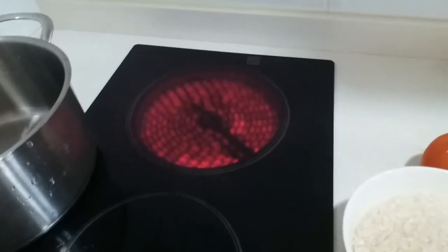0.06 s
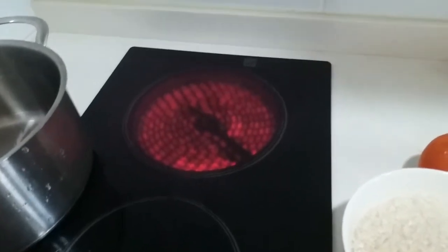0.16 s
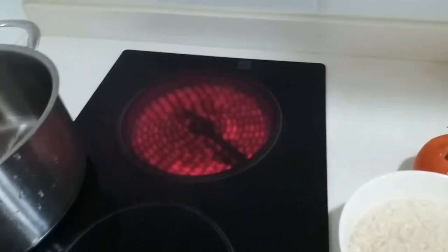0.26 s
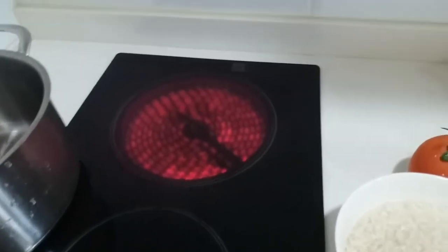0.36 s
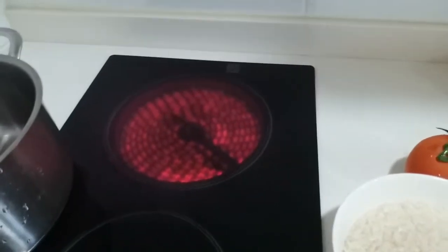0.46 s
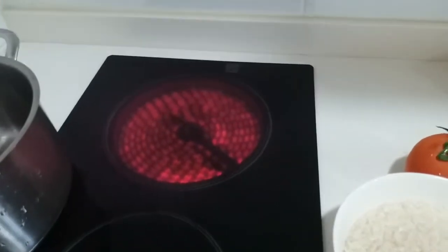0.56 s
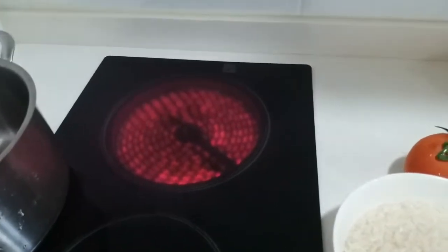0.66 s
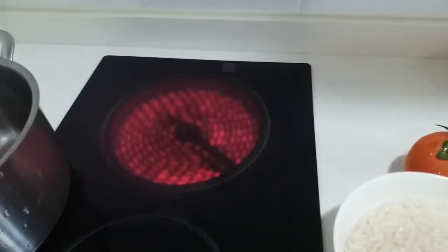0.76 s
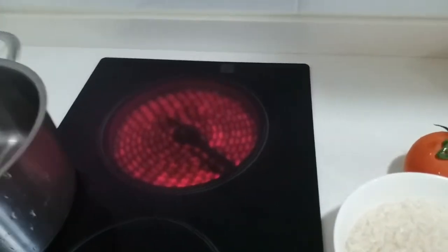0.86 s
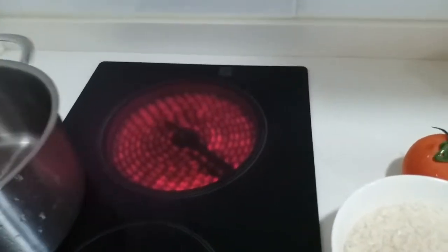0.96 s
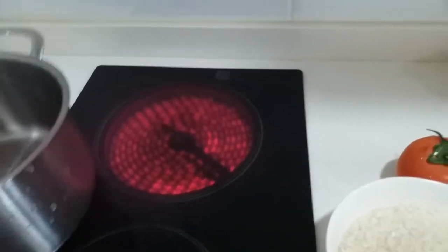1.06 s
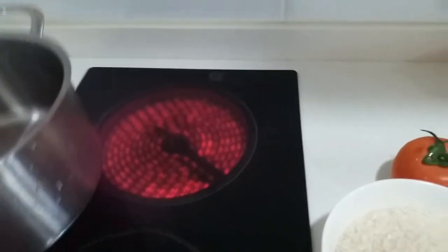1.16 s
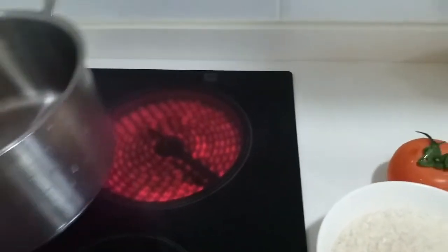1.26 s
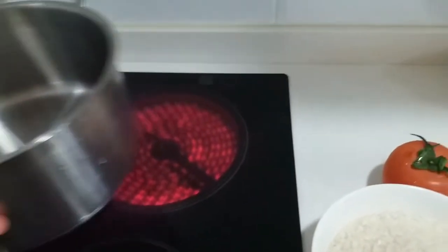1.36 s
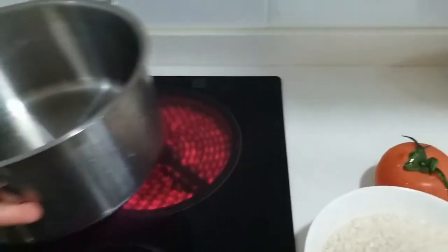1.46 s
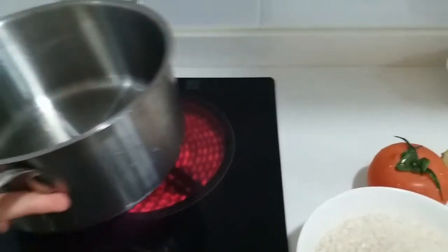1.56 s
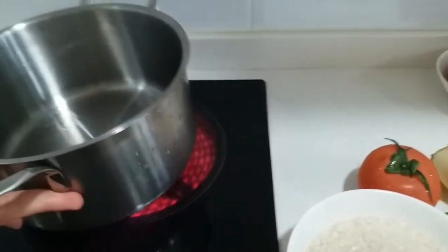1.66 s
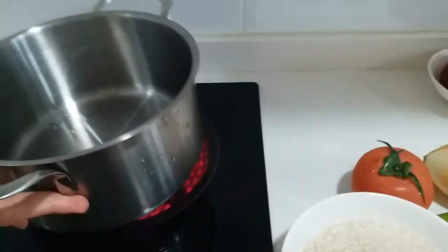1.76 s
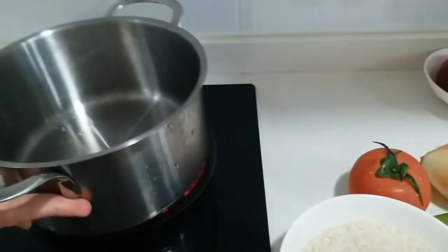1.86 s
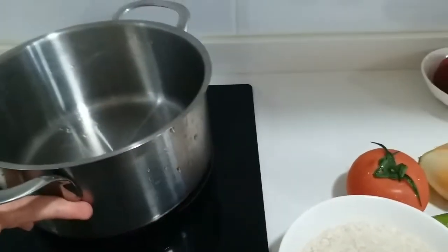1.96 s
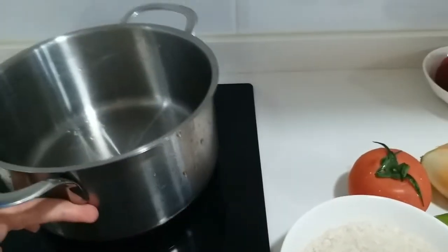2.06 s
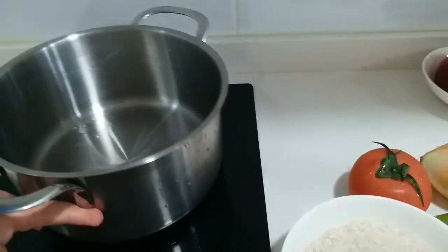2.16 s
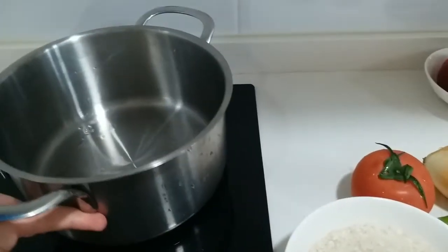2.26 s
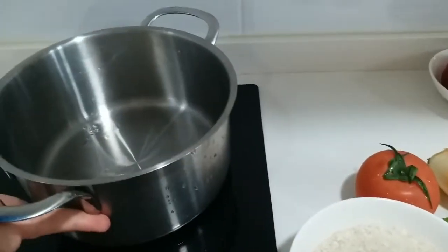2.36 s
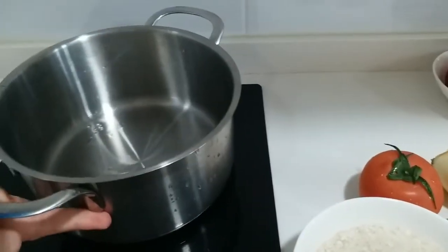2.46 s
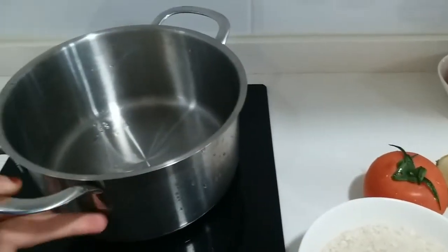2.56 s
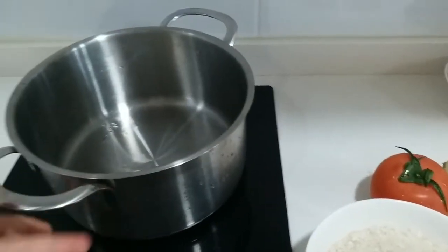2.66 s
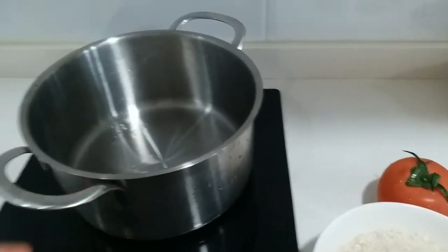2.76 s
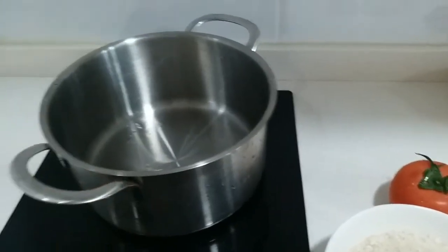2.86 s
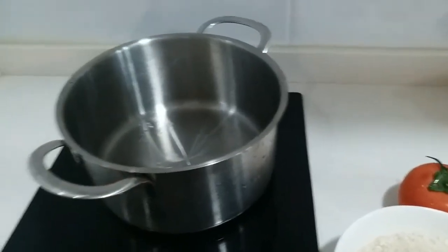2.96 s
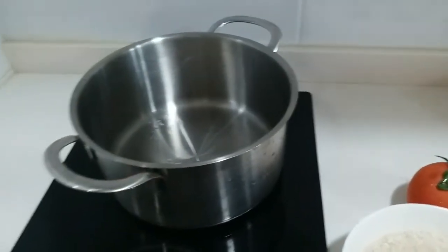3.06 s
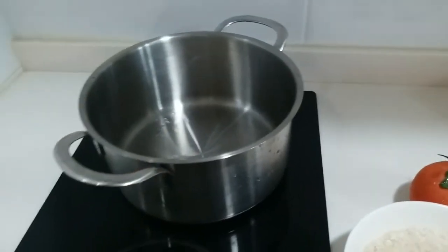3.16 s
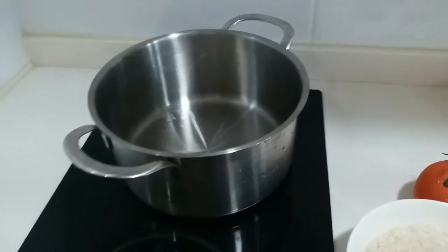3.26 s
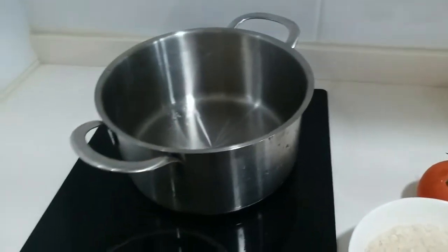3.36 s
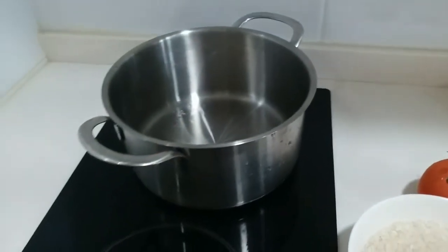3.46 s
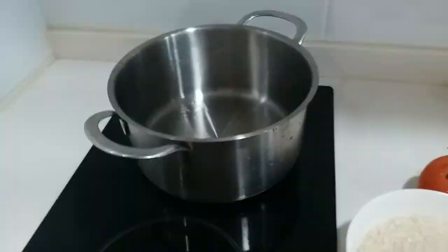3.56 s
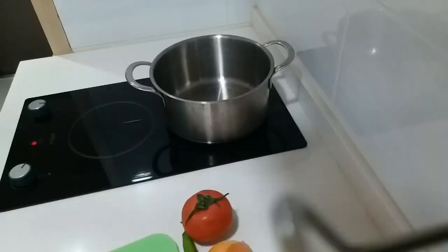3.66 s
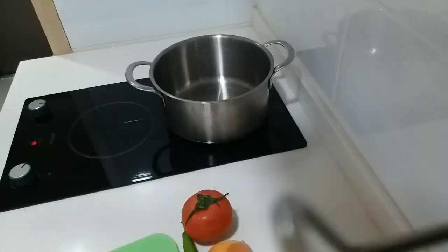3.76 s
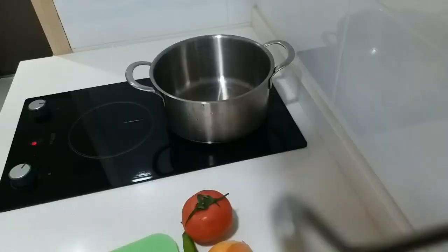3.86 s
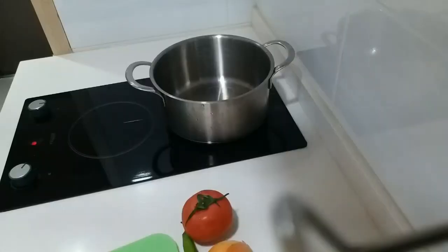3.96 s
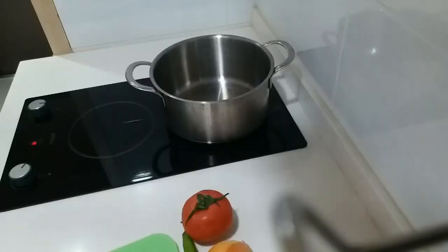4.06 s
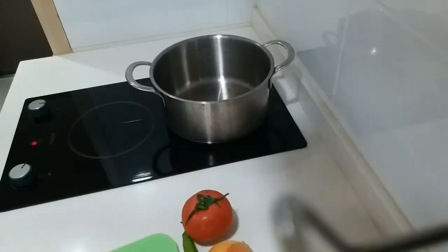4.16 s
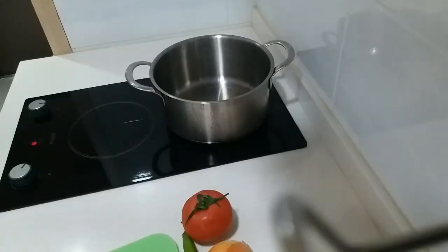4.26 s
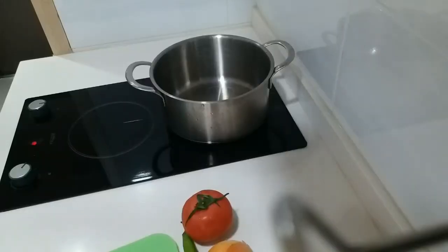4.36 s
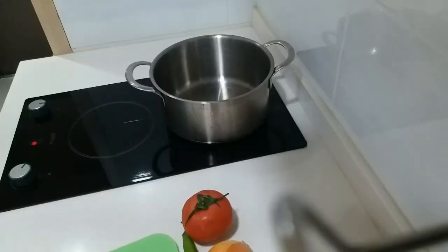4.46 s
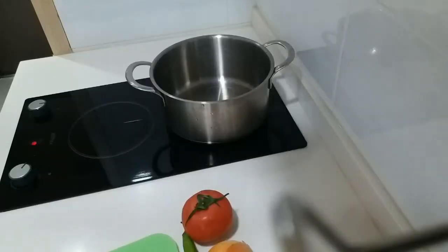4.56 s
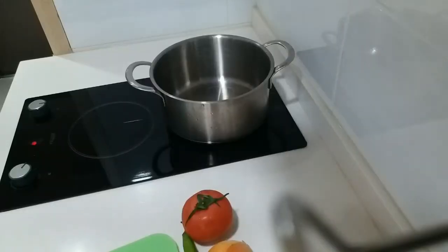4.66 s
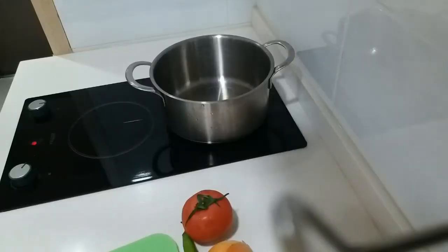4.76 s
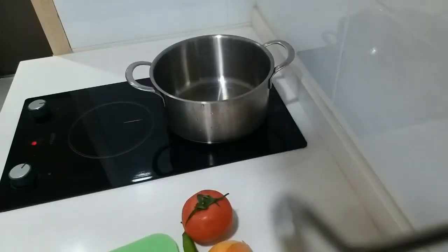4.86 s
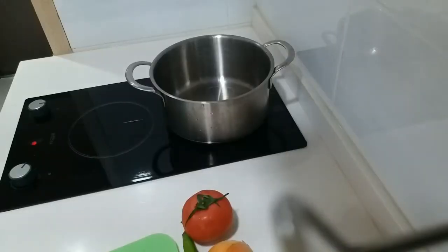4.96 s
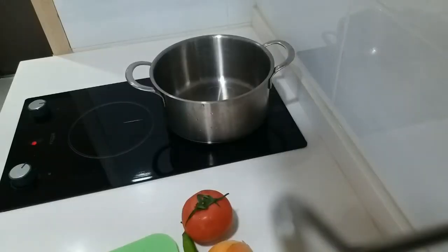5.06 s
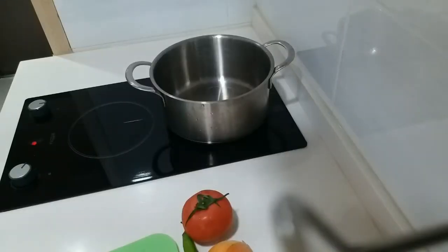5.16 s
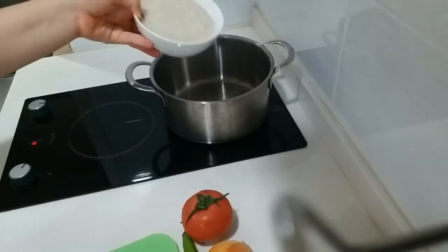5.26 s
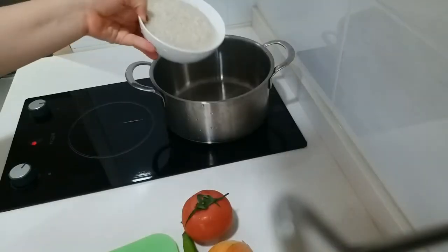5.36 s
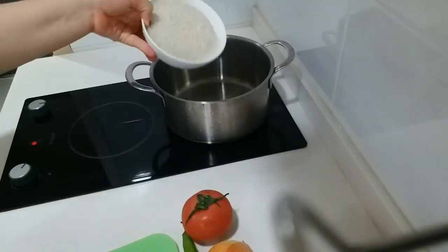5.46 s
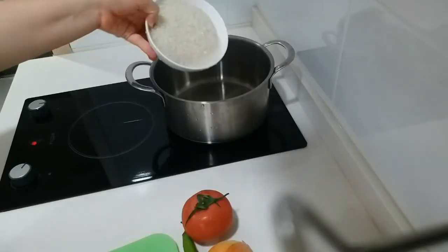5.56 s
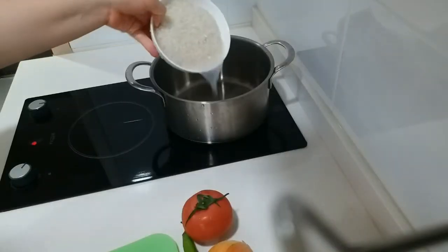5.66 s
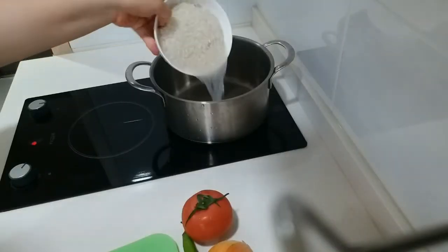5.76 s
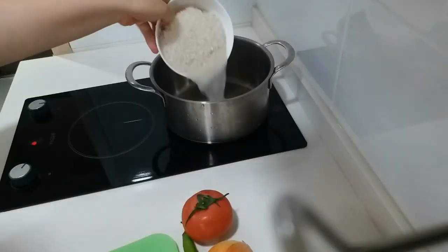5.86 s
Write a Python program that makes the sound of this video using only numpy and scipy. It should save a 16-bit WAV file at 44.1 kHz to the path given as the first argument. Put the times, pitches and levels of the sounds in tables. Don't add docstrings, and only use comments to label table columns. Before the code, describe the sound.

Brief metal scrapes, a ringing pot clank on glass, close stiff crackling snaps, and finally dry grains starting to pour into steel, over a faint appliance hum.

```python
import sys
import numpy as np
from scipy import signal
from scipy.io import wavfile
from scipy.ndimage import uniform_filter1d

SR = 44100
rng = np.random.default_rng(int(sys.argv[2]) if len(sys.argv) > 2 else 0)


def int16_out(signal):
    q = np.round(np.clip(np.atleast_2d(signal).T, -1, 1) * 32767)
    wavfile.write(sys.argv[1], SR, q.astype(np.int16))


def to_linear_factor(level_db):
    exponent = np.asarray(level_db, float) / 20
    return 10 ** exponent


N = 260190
PORT_LAG = 7

# time in seconds, level in dB.
DRONE_LOAD = [(0.0, -53.5), (0.49, -61.5), (1.0, -56), (1.15, -59.5), (1.36, -70.5), (1.69, -54),
              (1.77, -61.5), (2.3, -56), (2.65, -62), (3.42, -61), (3.53, -57.5), (4.34, -57), (4.4, -56),
              (5.01, -67), (5.36, -59), (5.52, -60), (5.78, -57.5), (5.9, -46.5)]
# frequency in Hz, density in dB per Hz.
FIZZ_COLOUR = [(4120, -43), (7000, -18.5), (8090, -13), (9170, -9.5), (9890, -4), (12000, 2.5),
               (15200, -2.5), (16000, -12.5)]
# start in seconds, level in dB.
LANDINGS = [
    (2.1259, -1),
    (2.1289, -6),
    (2.1332, -7),
    (2.1415, -14),
]


def evened(x):
    return x / np.sqrt(np.mean(x ** 2) + 1e-20)


def read(points, hz):
    f, value = np.transpose(points)
    return np.interp(np.log(hz + 1), np.log(f + 1), value)


def add(mix, s, sound):
    part = mix[..., round(s * SR):][..., :sound.shape[-1]]
    part += sound[..., :part.shape[-1]]


def curve(rows, column):
    rows = np.asarray(rows)
    return to_linear_factor(np.interp(np.arange(N) / SR, rows[:, 0], rows[:, column], -140, -140))


def band(x, lo_hz, hi_hz):
    return signal.sosfilt(signal.butter(3, [lo_hz, hi_hz], "bandpass", fs=SR, output="sos"), x)


def colour(x, points):
    level_db = np.maximum(read(points, abs(np.fft.fftfreq(4096, 1 / SR))), -100)
    spectrum = np.exp(np.conj(signal.hilbert(np.log(to_linear_factor(level_db)))))
    taps = np.fft.ifft(spectrum).real[:2048]
    taps = np.broadcast_to(taps, x.shape[:-1] + taps.shape) / np.linalg.norm(taps)
    return signal.oaconvolve(x, taps, axes=-1)[..., :N]


def resonate(x, hz, width):
    pole = np.exp((2j * np.pi * hz - np.pi * width) / SR)
    return 2 * signal.lfilter([1 - abs(pole)], [1, -pole], x).real


def ring(x, peaks):
    return evened(sum(to_linear_factor(db) * resonate(x, hz, width) for hz, width, db in peaks))


def grains(per_s, spread_db):
    size_db = spread_db * np.minimum(rng.exponential(1, (2, N)), 4)
    size = to_linear_factor(size_db) * rng.choice([-1., 1.], (2, N))
    return evened(size * (rng.random((2, N)) < per_s / SR))


def sides(pan_db):
    return to_linear_factor(np.array([[pan_db / 2], [-pan_db / 2]]))


def room_tone():
    # frequency in Hz, density in dB per Hz.
    near_colour = [(15, -82), (25, -52), (84, -9.5), (102, -16), (123, -2), (161, -24.5), (185, -20.5),
                   (335, -13.5), (384, -32), (451, -18), (714, -31), (1050, -36), (1700, -32),
                   (2840, -41.5), (3820, -50.5), (16000, -48)]
    far_colour = [(15, -60), (25, -39), (42, -11.5), (87, -12.5), (120, -2.5), (145, -12.5), (263, -5.5),
                  (317, -25), (384, -12.5), (463, -23.5), (659, -31.5), (2000, -44.5), (2760, -34.5),
                  (3620, -50), (16000, -49)]
    # frequency in Hz, left-right likeness from 0 to 1.
    likeness = [(60, 1), (150, 0.9), (380, 0.8), (700, 0.3), (1290, 0), (5980, 0.12), (15000, 0.12)]
    near_db, far_db, move_s = -62.5, -57.5, 3.6
    murmur_share, rumble_share = .3, .35

    frames, hz = N // 512 + 5, np.fft.rfftfreq(2048, 1 / SR)
    a, b, c, d, patches = rng.standard_normal((frames, 1025, 5)).T
    patches = evened(uniform_filter1d(uniform_filter1d(patches, 20, 0), 8, 1))
    same = np.clip(read(likeness, hz), -1, 1)[:, None]
    left = a + 1j * b
    right = same * left + np.sqrt(1 - same ** 2) * (c + 1j * d)
    right *= np.exp(2j * np.pi * hz * (hz < 700) * PORT_LAG / SR)[:, None]
    z = np.array([left, right])
    z *= to_linear_factor(np.where(hz < 1500, 1.5, .5)[:, None] * patches)
    load_db = np.interp(np.arange(frames) * 512 / SR, *np.transpose(DRONE_LOAD))
    for share, inside in ((murmur_share, (hz > 170) & (hz < 900)), (rumble_share, hz < 100)):
        z[:, inside] *= to_linear_factor(share * (load_db - load_db.mean()))

    def heard(points, db):
        shaped = z * to_linear_factor(read(points, hz))[:, None]
        x = signal.istft(shaped, nperseg=2048, noverlap=1536)[1][:, :N]
        return to_linear_factor(db) * x / band(x, 200, 16000).std()

    far = np.clip((np.arange(N) / SR - move_s) / 0.035, 0, 1)
    return (1 - far) * heard(near_colour, near_db) + far * heard(far_colour, far_db)


def drone():
    # frequency in Hz, width in Hz, level in dB.
    room_modes = [
        (119.65, 15, 0.5),
        (155.16, 14, -6),
        (347, 45, -12.5),
    ]
    waver_db, waver_hz = 4, 4.4
    noise = rng.standard_normal(N)
    main, *others = (to_linear_factor(db) * evened(resonate(resonate(noise, hz, w), hz, w)) for hz, w, db in room_modes)
    main = main / np.sqrt(uniform_filter1d(main ** 2, 1500) + 0.0057)
    waver = evened(resonate(rng.standard_normal(N), 0, waver_hz))
    waver = to_linear_factor(waver_db * evened(uniform_filter1d(waver, 900)))
    hum = curve(DRONE_LOAD, 1) * to_linear_factor(4.0) * waver * main + to_linear_factor(-56.5) * sum(others)
    whine = evened(band(rng.standard_normal((2, N)), 2640, 2900))
    return np.array([np.roll(hum, PORT_LAG), hum]) + to_linear_factor(-81) * waver ** .3 * whine


def kitchen(x):
    # frequency in Hz, t60 in seconds.
    decay = [(120, .32), (400, .3), (1500, .37), (4000, .3), (12000, .28)]
    taps = np.zeros((2, SR // 2))
    at = np.arange(120, SR // 2 - 20, 20)
    at = at + rng.integers(0, 20, (2, len(at)))
    np.put_along_axis(taps, at, rng.choice([-1., 1.], at.shape), 1)
    hz, t, z = signal.stft(taps, SR, nperseg=256)
    tail = signal.istft(z * to_linear_factor(-60 * t / read(decay, hz)[:, None]), SR, nperseg=256)[1]
    return signal.fftconvolve(x, tail / np.linalg.norm(tail[0]), axes=1)[:, :N]


def bumps():
    # start in seconds, level in dB, top frequency in Hz, length in ms.
    knocks = [
        (3.104, -60, 1800, 3.0),
        (0.948, -44, 820, 2.8),
        (2.367, -38, 151.4, 6.8),
        (3.573, -54, 2650, 7.1),
        (3.647, -57.5, 400, 8.9),
        (5.175, -67, 2000, 4),
    ]
    out, t = np.zeros((2, N)), np.arange(4000) / SR
    for s, db, top_hz, ms in knocks:
        push = rng.standard_normal((2, len(t))) * np.exp(-1000 * t / ms)
        push = signal.lfilter([1], [1, -.97], push)
        add(out, s, to_linear_factor(db) * band(push, 38, top_hz))
    return out


def faint_rattle():
    # start in seconds, level in dB.
    rattle_ticks = [(1.145, -56), (1.178, -57), (1.282, -56), (1.313, -54), (1.346, -54), (1.379, -52),
                    (1.452, -56)]
    out, t = np.zeros((2, N)), np.arange(800) / SR
    for s, db in rattle_ticks:
        add(out, s, to_linear_factor(db) * rng.standard_normal((2, len(t))) * np.exp(-1000 * t / 2.5))
    return band(out, 1700, 3000)


def strokes():
    # peak in seconds, rise and fall in seconds, level in dB, brightness in dB.
    drags = [
        (0.001, 0.0036, 0.0033, -46, -9),
        (0.486, 0.016, 0.06, -44.5, -7.5),
        (0.724, 0.47, 0.039, -67.5, -7),
        (0.92, 0.13, 0.033, -53, -12.5),
        (0.958, 0.08, 0.027, -43, -17),
        (1.72, 0.038, 0.11, -59, -27),
    ]
    # frequency in Hz, width in Hz, level in dB.
    wall_modes = [
        [(380, 43, -4.5), (947, 27, -22), (2290, 32, -11), (3650, 120, -7), (5830, 500, -6)],
        [(400, 19, -11), (947, 36, -23), (2297, 26, -17), (3460, 28, -14.5), (4840, 33, -31), (5370, 31, -30),
         (6170, 530, -22)],
        [(5370, 170, 5), (5850, 200, -12.5)],
        [(2186, 60, -1), (2600, 86, -6), (3140, 140, -12), (3460, 60, -8), (3950, 33, 0), (5600, 72, -9)],
        [(595, 15, -22), (1200, 130, -5), (2016, 80, 0), (2260, 51, 2.5), (2730, 240, -2.5), (3430, 31, -6),
         (3960, 37, 6), (5540, 90, 0)],
        [(1037, 32, 0), (2310, 100, -1.5), (3330, 75, -29), (5340, 380, 3)],
    ]
    # frequency in Hz, density in dB per Hz.
    scrape_colour = [(120, -20), (200, 8.5), (269, -7), (391, -3), (1700, -18.5), (2230, -12), (2470, -18),
                     (5520, -17.5), (7000, -56), (9100, -41), (15400, -120)]
    # start in seconds, peak
    # in dB, pitch in Hz, t60 in seconds.
    pitched_taps = [(0.483, -47.5, 1120, 0.1), (0.481, -52, 2330, 0.11), (0.4828, -48, 400, 0.064),
                    (0.495, -43, 950, 0.1), (3.5, -63.5, 3300, 0.054), (0.537, -48, 947, 0.056),
                    (0.914, -48.5, 5500, 0.06), (0.972, -51, 3960, 0.03), (4.376, -30.5, 4240, 0.04),
                    (4.7604, -30, 2600, 0.018), (0.949, -49, 2280, 0.14), (0.962, -45.5, 3556, 0.11),
                    (1.065, -48.5, 1110, 0.19), (1.717, -51, 1103, 0.096), (1.719, -57.5, 2310, 0.11),
                    (1.757, -56, 1101, 0.14)]
    span_db = 17.5
    bright_steeper, rumble_db = 1.2, -9.5

    slips, out = grains(1500, 4.2), np.zeros((2, N))
    raw, fizz = colour(slips, scrape_colour), colour(slips, FIZZ_COLOUR)
    rumble = evened(band(slips.sum(0), 54, 174))
    for (s, rise, fall, db, bright_db), peaks in zip(drags, wall_modes):
        span = slice(max(round((s - 2 * rise) * SR), 0), round((s + 2 * fall) * SR))
        t = np.arange(N)[span] / SR - s
        under_db = -span_db * np.where(t < 0, -t / rise, t / fall)
        rub = raw[:, span] + to_linear_factor(-1.5) * ring(slips[:, span], peaks)
        bright = evened(band(rub, 4060, 8400)) + to_linear_factor(-13.5) * fizz[:, span]
        bright = to_linear_factor(bright_db + bright_steeper * under_db) * bright
        bright = bright + to_linear_factor(rumble_db + under_db) * rumble[span]
        out[:, span] += to_linear_factor(db + under_db) * evened(band(rub, 223, 2700)) + to_linear_factor(db) * bright
    t = np.arange(6000) / SR
    for s, db, hz, t60 in pitched_taps:
        knock = to_linear_factor(-9.0) * rng.standard_normal(len(t)) * np.exp(-t / 0.0032)
        tone = to_linear_factor(db - 6.5 - 60 * t / min(t60, .12)) * np.sin(2 * np.pi * hz * t)
        add(out, s, tone + to_linear_factor(db) * band(knock, 300, 4400))
    return out * sides(5.3)


def clank():
    # frequency in Hz, density in dB per Hz.
    blow_colour = [(50, -29.5), (85, -4), (267, -14), (350, -7.5), (480, -12.5), (760, -17), (869, -18),
                   (1050, -13.5), (1190, -18.5), (1980, -14), (2630, -20.5), (3680, -21), (7500, -38),
                   (9750, -50.5), (16500, -120)]
    t, blows = np.arange(SR // 2) / SR, np.zeros((2, N))
    for s, db in LANDINGS:
        add(blows[0], s + .0003, -to_linear_factor([db]))
        add(blows[1], s, -to_linear_factor([db]))
    rattle = to_linear_factor(-21.0 - 60 * t / 0.082) * grains(3000, 1.2)[:, :len(t)]
    add(blows, LANDINGS[1][0], rattle)
    return (to_linear_factor(8.0) * colour(blows, blow_colour) + to_linear_factor(-17.0) * colour(blows, FIZZ_COLOUR)) * sides(1.6)


def pot_ring():
    # frequency in Hz, level in dB, t60 in seconds.
    pot_modes = [(118, -5, 2.5), (346, 2, 0.4), (581, -6, 0.31), (706, -9, 0.39), (775, -18, 0.3),
                 (1066, -4, 0.27), (1270, -10, 0.22), (1352, -11, 0.5), (1458, -14, 0.35), (1700, -11, 0.6),
                 (1814, -7, 0.23), (1954, -8, 0.25), (2017, -9, 0.3), (2180, 0, 0.13), (2297, -7, 0.4),
                 (2455, -11, 0.34), (2756, -8, 0.22), (3009, -18, 0.27), (3117, -20, 0.41),
                 (3392, -15, 0.37), (3579, -12, 0.4), (4002, -15, 0.37), (4517, -26, 0.42),
                 (4791, -27, 0.3), (5367, -20, 0.29), (6175, -21, 0.18), (6455, -23, 0.19)]
    glass_modes = [(81.4, -8.5, 0.4), (137, -9, 0.3), (161, -4.5, 0.5), (212.5, -9.5, 0.27),
                   (274, -8.5, 0.35), (312, -9, 0.35), (430, -12.5, 0.9), (505, -13.5, 0.44),
                   (400, -19.5, 0.1)]
    modes = pot_modes + glass_modes
    t, out = np.arange(SR // 2) / SR, np.zeros((2, N))
    phases = rng.uniform(-1.3, 1.3, (len(modes), 2, 1))
    ringing = np.zeros((2, len(t)))
    for (hz, db, t60), phase in zip(modes, phases):
        longest = .62 if hz < 130 else .45 if hz < 2000 else .38 if hz < 2400 else .27
        wave = np.sin(2 * np.pi * hz * t + phase * (hz > 500))
        ringing += to_linear_factor(db - 60 * t / min(t60, longest)) * wave
    add(out, LANDINGS[0][0], to_linear_factor(-22.) * ringing * np.minimum(t / .002, 1))
    return out * sides(4.1)


def crackle():
    # start in seconds, peak in dB, fizz in dB, left-right difference in dB, edge in dB.
    snaps = [(3.631, -61.5, -14, 0, 3.5), (3.728, -56.5, -1, 0, 0), (3.744, -51, -8, 2, 3),
             (3.754, -51.5, -3, 3, 4), (3.773, -45, -9, -1, 6), (3.788, -42.5, -5, 5, 4),
             (3.819, -30, -15, 5, -6), (3.833, -35.5, -13, 2, -1), (3.856, -32, -18, 5, -1.5),
             (3.865, -34, -15, 1.5, -1), (3.877, -50, -10, 2.5, 2), (3.892, -50, -6, 2, 9),
             (3.924, -33.5, -11.5, -1, -1), (3.939, -34.5, -16, -1.5, 4), (3.979, -52, -2.5, 1, 2),
             (4.014, -32.5, -8, -1.5, -1), (4.028, -40, -16, -1, 1.5), (4.065, -49, -9, 7, 6),
             (4.088, -56, -8, 0, -2), (4.132, -28.5, -24.5, 0.5, -5.5), (4.174, -45.5, -13, 2, 3),
             (4.219, -41.5, -16, 1, 0), (4.255, -38, -16, 3, 0), (4.283, -42.5, -8, -3, 4),
             (4.298, -37.5, -17.5, 4, -1), (4.306, -42.5, -12, 2, 7), (4.34, -42.5, -11, 3, -0.5),
             (4.3768, -21, -18.5, 2.5, 1), (4.44, -37, -19, 5.5, 0), (4.474, -50, -11, -2, 1.5),
             (4.588, -59, -7, -1, 3.5), (4.682, -43, -7.5, 1, 3), (4.76, -31, -19.5, 3.5, 0.5),
             (4.873, -59.5, -13, -1, 1)]
    # time in seconds, level in dB.
    effort = [(3.69, -76), (3.73, -58), (3.772, -49.5), (3.898, -54.5), (3.942, -54.5), (4.066, -55.5),
              (4.11, -63.5), (4.2, -69), (4.302, -72), (4.37, -68), (4.4, -47), (4.446, -54.5), (4.52, -95)]
    # frequency in Hz, density in dB per Hz.
    snap_colour = [(290, -31), (500, -3), (852, -2), (922, -2.5), (1430, -1.5), (1840, -7), (2130, -2),
                   (3800, -8), (7500, -15.5), (9750, -44), (16500, -120)]
    spray_ms, spray_spread, sharper = 8.5, .15, .1
    thump_db, thump_spread_db, thump_share = -9.5, 2.5, .6
    edge_from_hz, click, click_grows = 1720, 4.5, 0.55

    body, edge, fizz = np.zeros((3, 2, N))
    thump, t = np.zeros(N), np.arange(2000) / SR
    for s, db, fizz_db, pan_db, edge_db in snaps:
        longer, heavier = rng.standard_normal(2)
        ms = spray_ms * np.exp(spray_spread * longer) * to_linear_factor(-sharper * (db + 35))
        spray = rng.standard_normal((3, len(t))) * np.exp(-1000 * t / ms) * (1 + np.exp(-t / 0.00026))
        spray = spray * np.repeat(to_linear_factor(2.5 * rng.standard_normal(len(t) // 40)), 40)
        burst = to_linear_factor(db - 9.0) * sides(pan_db)
        first = click * to_linear_factor(click_grows * (db + 17)) * (t == 0)
        add(body, s, burst * (0.26 * spray[0] + 1.46 * spray[1:]))
        add(edge, s, burst * to_linear_factor(edge_db) * (1.11 * spray[1:] + first))
        add(fizz, s, to_linear_factor(db + fizz_db + 1.5) * sides(pan_db) * spray[1:])
        add(thump, s, to_linear_factor(thump_share * db + thump_db + thump_spread_db * heavier) * spray[0])
    small = curve(effort, 1) * grains(500, 2.0)
    low = band(body, 100, edge_from_hz) + band(edge, edge_from_hz, 14000) + to_linear_factor(-0.5) * small
    high = colour(fizz + to_linear_factor(-8.0) * small, FIZZ_COLOUR)
    return colour(low, snap_colour) + high + band(thump, 112, 500)


def rice():
    # time in seconds, level in dB.
    flow = [(5.771, -68), (5.779, -61.5), (5.794, -47), (5.815, -41.5), (5.826, -37.5), (5.886, -31.5),
            (5.9, -29.5)]
    slipping = [(5.68, -97.5), (5.696, -75), (5.724, -63.5), (5.778, -69), (5.8, -72)]
    # frequency in Hz, density in dB per Hz.
    grain_colour = [(180, -45), (300, -34), (550, -3), (835, -26), (893, -14), (2140, -11.5), (2320, -9),
                    (2840, -13), (5280, -10.5), (7500, -16), (9750, -80), (16500, -120)]
    # frequency in Hz, width in Hz, level in dB.
    standing_modes = [(545, 60, -8), (578, 30, -6), (1230, 40, -10), (1950, 40, -9), (2268, 12, 9),
                      (2700, 30, -9), (3015, 24, -1), (3380, 34, -10), (5190, 86, -14), (6110, 30, -12)]
    ring_up_s, thrum_db = 0.038, -11
    tick_db, tick_damp_db_per_s = 5.5, -64

    hits = grains(12000, 2.6)
    since = np.maximum(np.arange(N) / SR - flow[0][0], 0)
    rung = to_linear_factor(-4.0) * np.minimum(since / ring_up_s, 1) ** 2 * ring(hits, standing_modes)
    thrum = to_linear_factor(thrum_db) * evened(band(hits.sum(0), 54, 216))
    landing = colour(hits, grain_colour) + rung + thrum
    slip = resonate(resonate(grains(4700, 3.7), 1500, 400), 1500, 400)
    ticks = to_linear_factor(tick_db + tick_damp_db_per_s * since) * colour(hits, FIZZ_COLOUR)
    poured = curve(flow, 1) * (landing + ticks)
    return poured * sides(1.7) + curve(slipping, 1) * evened(slip)


def scene():
    sources = [(strokes(), -8.), (clank(), -4.), (pot_ring(), -10.), (crackle(), -11.), (bumps(), -4.),
               (rice(), -6.), (faint_rattle(), -8.)]
    direct = sum(x for x, wet_db in sources)
    sent = sum(to_linear_factor(wet_db) * x for x, wet_db in sources)
    near = direct + kitchen(band(sent, 210, 19000))
    near = near - 0.75 * resonate(near, 7100, 1900)
    mid, side = (near[0] + near[1]) / 2, (near[0] - near[1]) / 2
    apart = signal.sosfilt(signal.butter(4, 560, "highpass", fs=SR, output="sos"), side)
    side = to_linear_factor(0.55) * apart + to_linear_factor(-15.0) * (side - apart) + to_linear_factor(-10.0) * band(mid, 450, 5000)
    return np.array([mid + side, mid - side]) + room_tone() + drone()


def roll_off(x):
    return signal.sosfilt(signal.butter(12, 17060, fs=SR, output="sos"), x)


def record(dry):
    cut = signal.sosfilt(signal.butter(2, 45, "highpass", fs=SR, output="sos"), dry)
    treble_limit = signal.firwin(255, 15820, window=("kaiser", 8), fs=SR)
    mix = signal.oaconvolve(cut, treble_limit[None], "same")
    return roll_off(mix)


dry = scene()
out = record(dry)
int16_out(out)
```